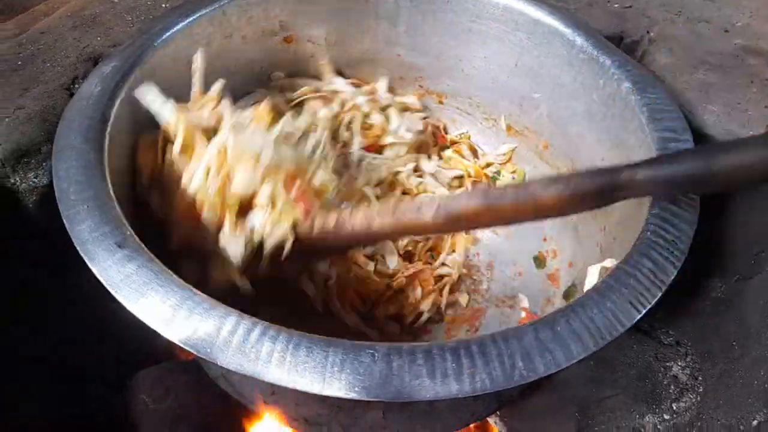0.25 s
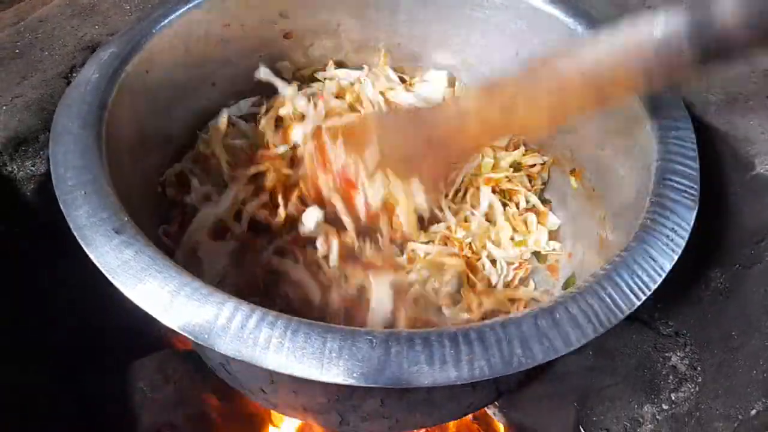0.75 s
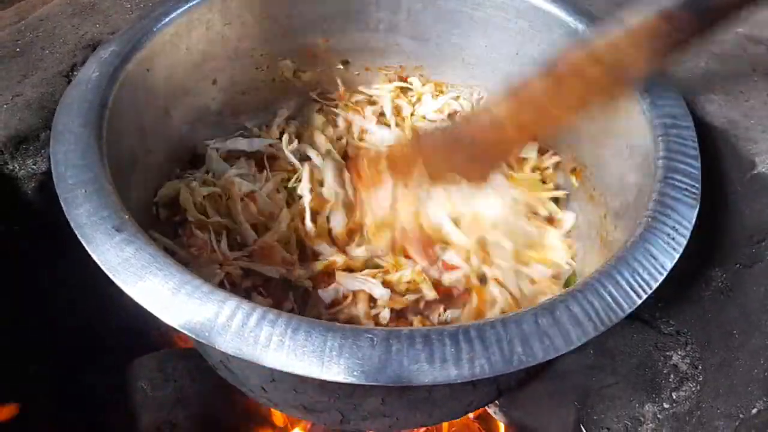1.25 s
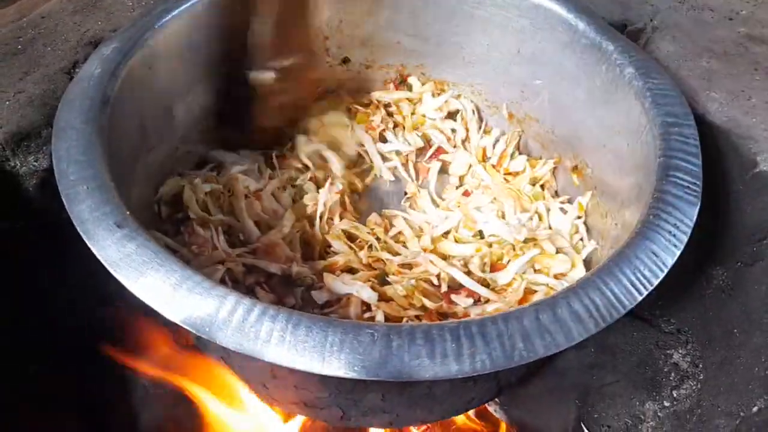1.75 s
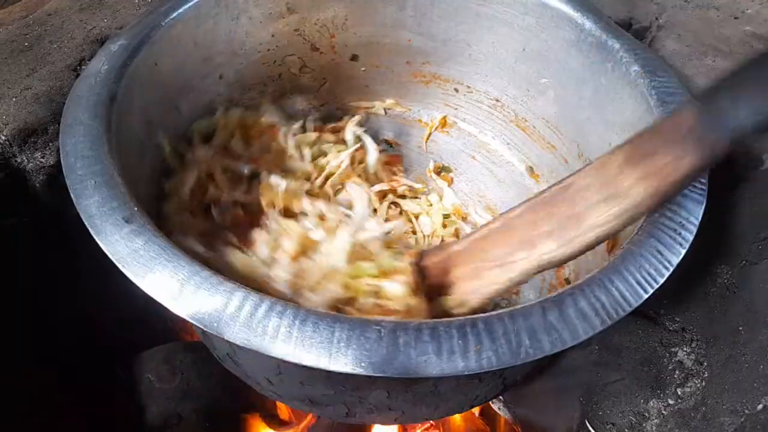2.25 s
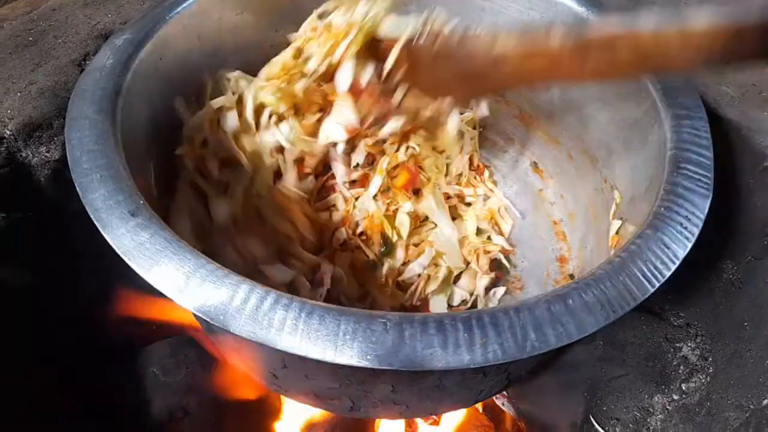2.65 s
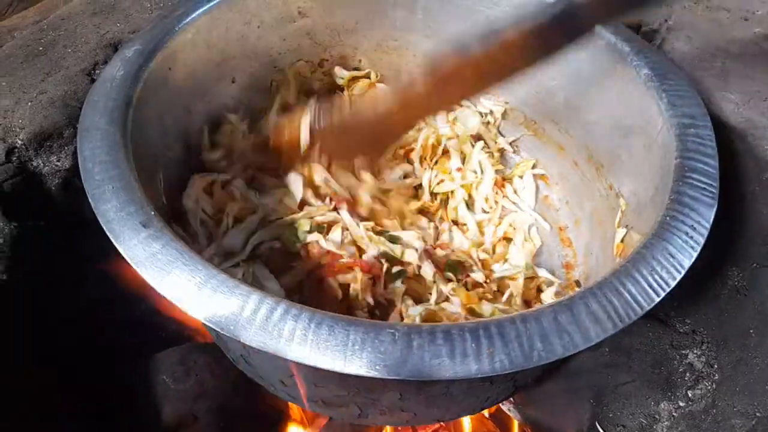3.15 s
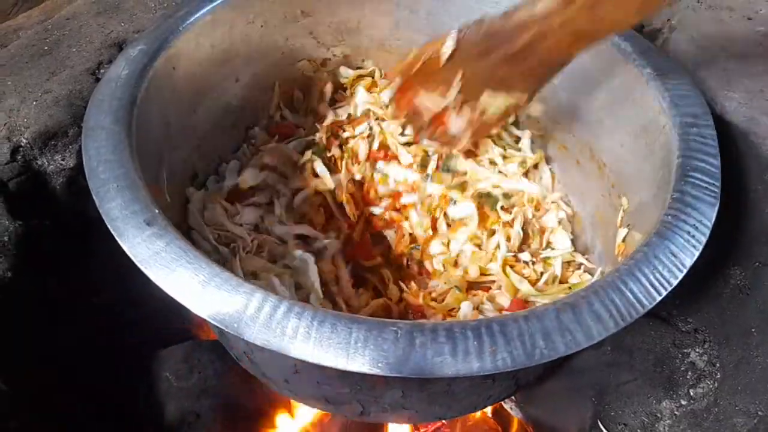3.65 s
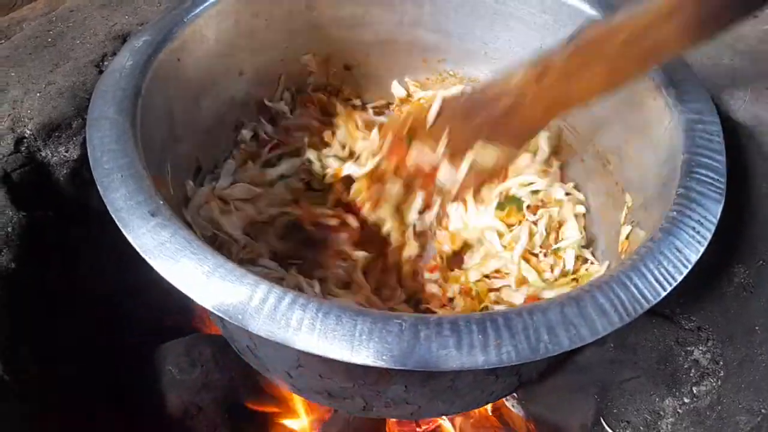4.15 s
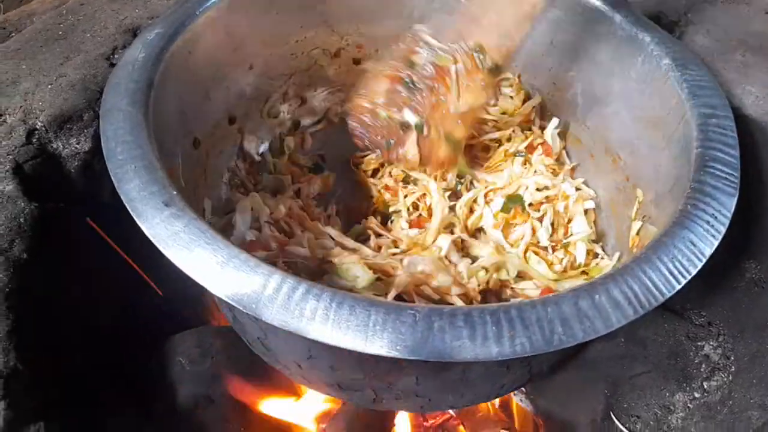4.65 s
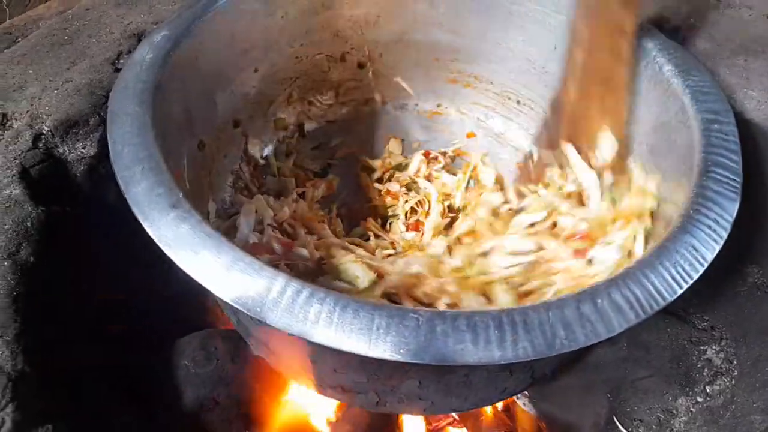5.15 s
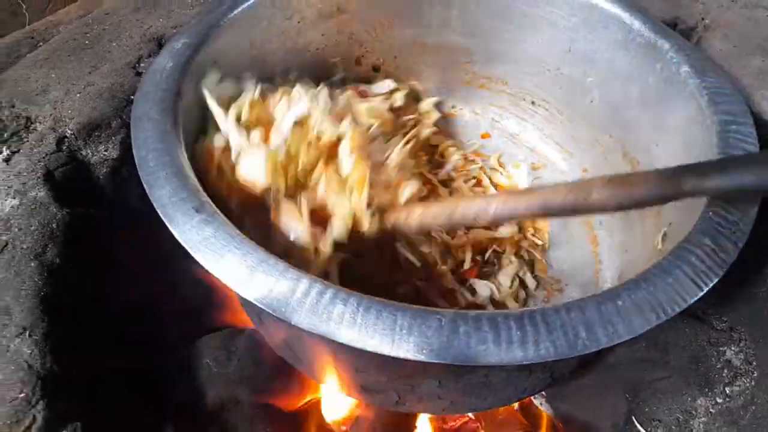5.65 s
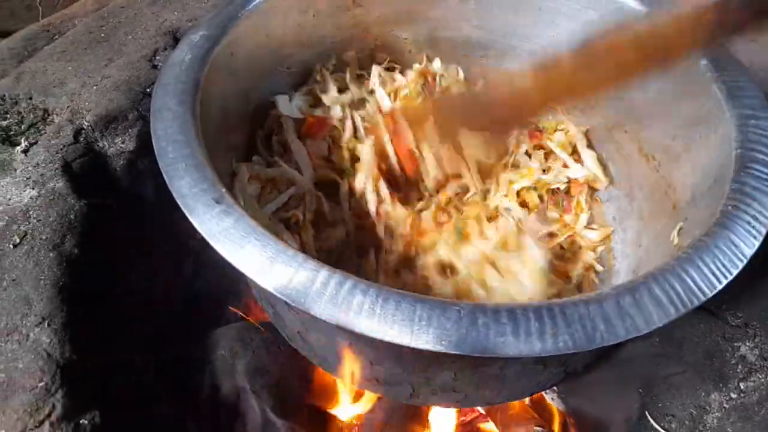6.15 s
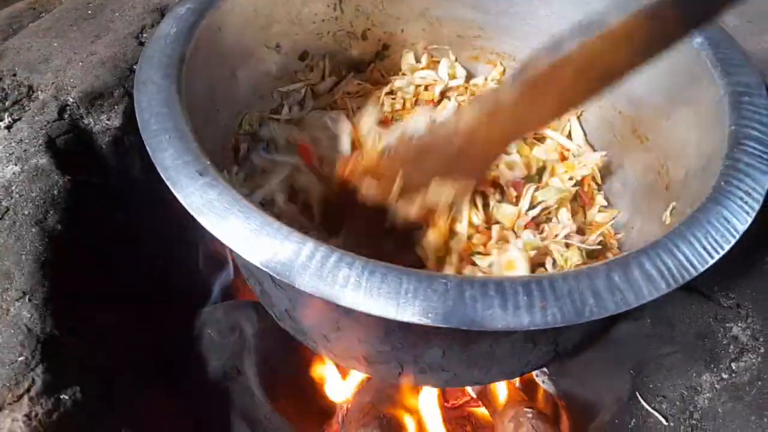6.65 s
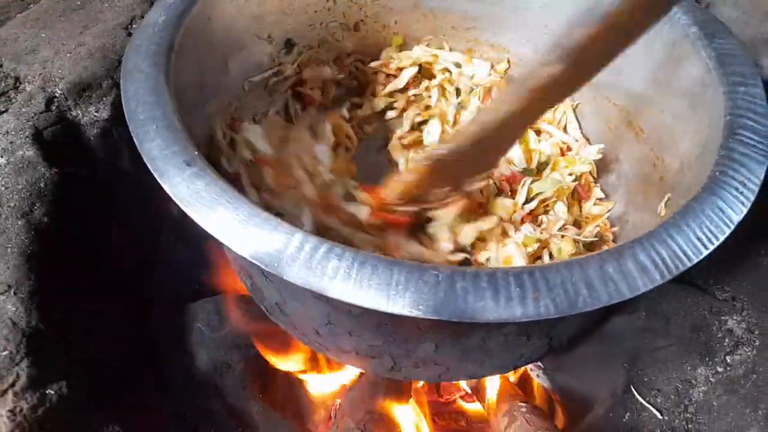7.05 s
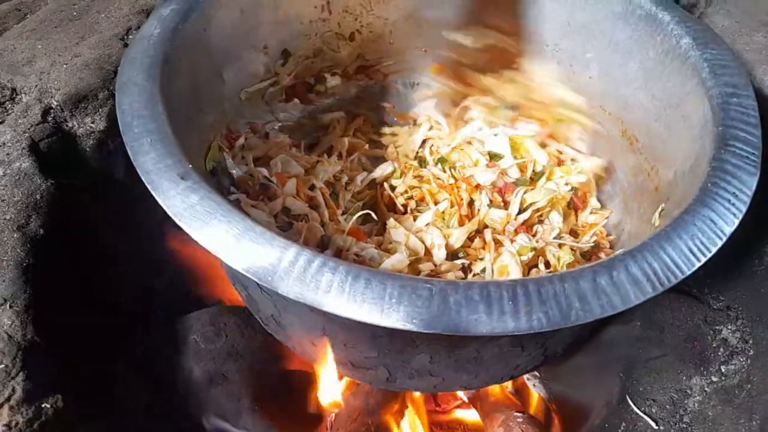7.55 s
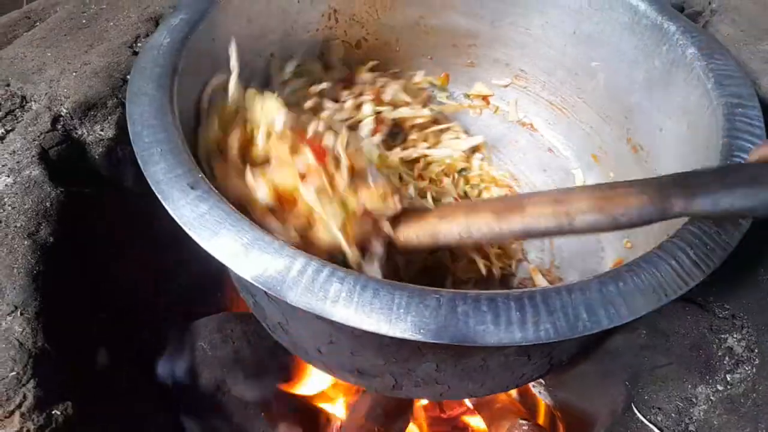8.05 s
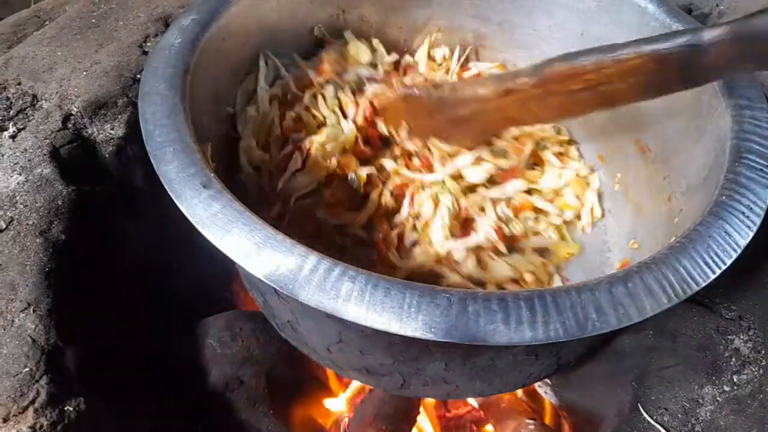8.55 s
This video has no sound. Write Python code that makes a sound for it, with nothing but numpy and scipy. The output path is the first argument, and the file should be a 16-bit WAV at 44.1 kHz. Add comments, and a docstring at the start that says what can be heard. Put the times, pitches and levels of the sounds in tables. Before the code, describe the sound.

Hollow wooden paddle knocks on a big metal pot, with frying hiss fading from strong to faint, small crackles, clinks and low fire rumble.

```python
"""A strong fry hiss, soon fainter, with bright ticks and flares: steam bubbles as shaped noise and packets.
A wooden paddle knocks and scrapes a wide metal pot of shredded vegetables: thumps, slips, dying modes.
Small metal clinks ring, and a steam whistle (narrow noise) glides upward midway.
Lumpy low noise makes the rumble of a wood fire together with the thudding, rocking pot;
a limiter ducks the whole mix after the loudest knocks."""
import sys
import numpy as np
from scipy import signal
from scipy.io import wavfile
from scipy.ndimage import uniform_filter1d, minimum_filter1d

SR = 44100
rng = np.random.default_rng(int(sys.argv[2]) if len(sys.argv) > 2 else 0)


def to_wav(s):
    """Save 16-bit WAV."""
    ch = np.atleast_2d(s).T  # columns
    pcm = np.round(np.clip(ch, -1, 1) * 32767)  # PCM
    wavfile.write(sys.argv[1], SR, pcm.astype(np.int16))


N = 388962


def amp(db):
    """Decibels to gain."""
    return 10 ** (np.asarray(db) / 20)


def even(x):
    """Scales to rms 1."""
    return x / np.sqrt(np.mean(x ** 2) + 1e-20)


def read(points, hz):
    """Reads a spectrum on a log-frequency axis."""
    f, value = np.transpose(points)
    return np.interp(np.log(hz + 1), np.log(f + 1), value)


def follow(rows, t):
    """Columns of a curve table at times t; end rows hold outside the table."""
    s, *columns = np.transpose(rows)
    return [np.interp(t, s, c) for c in columns]


def add(mix, s, sound):
    """Mixes a sound in at time s."""
    part = mix[..., round(s * SR):][..., :sound.shape[-1]]
    part += sound[..., :part.shape[-1]]


def pan(left_minus_right_db):
    """Left and right gains for a level difference."""
    return amp(np.multiply.outer([.5, -.5], left_minus_right_db))


def smooth_noise(count, width):
    """Random curve averaged over width steps, rms 1."""
    return even(uniform_filter1d(rng.standard_normal(count), width))


def ring(modes, extra_db=0., longer=1., rise_s=0.017, phase_rad=0.):
    """Sum of dying sines with a soft onset; longer scales each t60."""
    hz, db, t60_s = np.transpose(modes)[:, :, None]
    t = np.arange(SR // 3) / SR
    decay = amp(db + extra_db - 60 * t / (t60_s * longer))
    waves = decay * np.sin(2 * np.pi * hz * t + phase_rad)
    return waves.sum(0) * (1 - np.exp(-t / rise_s))


def packet(hz, cycles, length=2000):
    """Wave packet that swells over some cycles, then dies away."""
    t = np.arange(length) / SR
    u = t * hz / cycles
    return (u * np.exp(1 - u)) ** 2.32 * np.sin(2 * np.pi * hz * t + 3.17)


def noise(field_db, same, size):
    """Two-channel noise from random short-time spectra; field_db(hz, t) gives spectrum and level course."""
    hop = size // 4
    hz, t = np.fft.rfftfreq(size, 1 / SR), np.arange(N // hop + 5) * hop / SR
    a, b, c, d = rng.standard_normal((len(t), len(hz), 4)).T
    same = np.clip(same(hz), -1, 1)[:, None]
    left = a + 1j * b
    right = same * left + np.sqrt(1 - same ** 2) * (c + 1j * d)
    shape_db, level_db = field_db(hz, t)
    spectra = np.array([left, right]) * amp(shape_db)
    waves = signal.istft(spectra, nperseg=size, noverlap=size - hop)[1]
    return even(waves[:, :N]) * amp(level_db)


# frying hiss course, fading overall, with a brief dip after the loud knock at 4.84 s:
# (time [s], hiss level [dB], low fizz against hiss [dB], top against hiss [dB])
FRYING_COURSE = [(0, -27, -2, -4), (0.14, -29, -11, -5.5), (0.22, -32.5, -6.5, -2), (0.4, -37, -10.5, 0.5),
                 (0.86, -36, -6, -4.5), (1.5, -41, -5, -3), (2.06, -38, -2.5, -7), (2.55, -40.5, -7, 2),
                 (3.1, -38.5, -3, -3.5), (3.66, -42.5, -6.5, 0), (4.27, -40.5, -8.5, -4.5),
                 (4.6, -42.5, -5, -4.5), (4.84, -42.5, -2, -1.5), (4.865, -46.5, 0.1, -3.5),
                 (4.93, -43, 0.5, -3), (5.3, -42.5, 1.5, -3), (5.65, -47, -8.5, -1),
                 (5.85, -46.5, -7.5, -2.1), (6.3, -43.5, -2.5, -2), (6.8, -46, -5.5, 1),
                 (7.17, -48, -1.5, -1), (7.45, -40, -4.5, -6.5), (8.0, -43, -3, 1), (8.2, -48.5, -5, 1),
                 (8.82, -42.5, -3, -1)]
# wet leaves flare on hot metal:
# (time [s], level change [dB], half-width at half height [s], low fizz change [dB], top change [dB])
LEAF_FLARES = [(0.64, 0, 0.033, 8, 0.5), (1, -0.5, 0.023, 6.5, 7.5), (2.27, 5.5, 0.12, 1, 1),
               (2.768, 3.5, .03, 3, -5.5), (2.906, 3, 0.068, 0.5, 0), (3.198, 3.5, 0.037, 3.5, 5),
               (3.469, 5.5, 0.053, 6, -4.5), (3.88, 2.5, 0.046, 4.5, -3), (4.082, 3, 0.033, 3.5, -2.5),
               (4.433, 4, 0.075, 3, 1), (4.761, 2, .06, -2.5, -0.5), (4.95, 6.5, 0.022, -10, -7.5),
               (5.041, 4.5, 0.01, -7.5, -4), (5.49, 4, 0.054, -2, 0.1), (5.728, -1.7, .04, 13, 1.5),
               (6.392, 5, 0.039, 1.5, -2.5), (6.612, 5.5, 0.048, 3, -4), (6.907, 0.5, 0.019, 7.5, -2),
               (7.015, 3.5, .05, 6.5, -1), (7.33, 3, 0.014, -3.5, -6), (7.58, 1, 0.055, 5, 0),
               (7.741, -1.2, 0.035, 8.5, 0), (7.888, 3.5, 0.035, 3, -2.5), (8.14, 3, 0.065, -5.5, -0.5),
               (8.387, 0, 0.019, 8, 2), (8.542, 1, 0.1, 2.5, -0.5)]


def heat(t):
    """Frying level, low fizz and top in dB: the fading course plus a smooth hump per flare."""
    course = np.array(follow(FRYING_COURSE, t))
    for s, level_db, half_s, low_db, top_db in LEAF_FLARES:
        near = slice(*np.searchsorted(t, [s - 2 * half_s, s + 2 * half_s]))
        hump = np.cos(np.pi / 4 * (t[near] - s) / half_s) ** 2
        course[:, near] += np.outer([level_db, low_db, top_db], hump)
    return course


# hiss spectrum: (frequency [Hz], density [dB per Hz])
HISS_SPECTRUM = [(350, -5), (700, -8.5), (1040, -4), (1400, -4), (2200, -3.5), (3170, -5), (4500, -3.5),
                 (6000, -1.5), (7170, -3.5), (8220, -17.5), (9500, -11), (11700, -6.5), (15000, -9),
                 (16000, -4.5)]
# left-right likeness of the hiss: (frequency [Hz], correlation [1])
HISS_LIKENESS = [(550, 0.69), (1650, 0.023), (5000, 0.011)]
# hiss balance: (frequency [Hz], left minus right [dB])
HISS_LEAN = [(60, 4), (150, -12.5), (380, 6), (950, -2.5), (2380, 0.5), (5980, -8), (15000, -5.5)]
DRIFT_DB_PER_S = 0.28  # hiss above the low fizz drifts leftward


def frying():
    """Countless bursting steam bubbles: hiss with drifting patches and a shared flicker."""
    def field(hz, t):
        _, low_db, top_db = heat(t)
        low, top = np.clip((4200 - hz) / 2700.0, 0, 1), np.clip((hz - 7400) / 1200., 0, 1)
        tilt_db = np.outer(low, low_db - low_db.mean()) + np.outer(top, top_db - top_db.mean())
        patches = uniform_filter1d(rng.standard_normal(tilt_db.shape), 6, 0)  # along frequency
        patches = even(uniform_filter1d(patches, 30, 1))  # along time
        flicker_db = 0.97 * rng.standard_normal(len(t)) + 0.63 * smooth_noise(len(t), 30)
        wander_db = DRIFT_DB_PER_S * (t - t.mean()) + 0.93 * smooth_noise(len(t), 40)
        lean_db = read(HISS_LEAN, hz)[:, None] + (1 - low[:, None]) * wander_db
        shape_db = read(HISS_SPECTRUM, hz)[:, None] + tilt_db + 1.3 * patches + flicker_db
        shape_db = shape_db + np.multiply.outer([.5, -.5], lean_db)
        return shape_db, heat(np.arange(N) / SR)[0]
    return noise(field, lambda hz: read(HISS_LIKENESS, hz), size=256)


CRACKLE_DB, POPS_PER_S = -16, 600.  # level against the hiss; mean rate


def crackle():
    """Small bubbles popping at random over the hiss: short packets in 16 pitches."""
    level_db, out = heat(np.arange(N) / SR)[0], np.zeros((2, N))
    size_db = 3.5 * np.minimum(rng.exponential(1, N), 3.5)
    pops = amp(size_db) * (rng.random(N) < POPS_PER_S / SR)
    pitches_hz = np.geomspace(2500, 14500, 16)
    kind = rng.integers(0, len(pitches_hz), N)
    for k, hz in enumerate(pitches_hz):
        grain = amp(read(HISS_SPECTRUM, hz)) * (hz / 6000) ** 1.46 * packet(hz, 2.46, length=300)
        place = pan(read(HISS_LEAN, hz) + 3 * rng.standard_normal())[:, None]
        out += place * signal.oaconvolve(pops * (kind == k), grain)[:N]
    return amp(level_db + CRACKLE_DB) * even(out)


# short bright ticks, spits of fat and the bright attacks of metal clinks:
# (time [s], level [dB], frequency [Hz], left minus right [dB])
BRIGHT_TICKS = [(1.2456, -38, 5500, -5.5), (1.388, -37, 5980, -24), (2.582, -32, 5800, -6.5),
                (2.62, -23, 1400, 0.1), (2.7232, -19.5, 4750, -8), (3.1667, -35, 2640, -1),
                (3.4516, -36, 4890, -6), (3.4815, -29, 7020, -13), (3.729, -25, 2780, 3),
                (3.75, -30, 2820, 3), (4.0362, -25, 5450, -10), (4.1944, -26, 3600, -2),
                (4.3125, -22.5, 2240, 2), (4.7955, -35, 5480, 1), (4.92, -22, 5780, -6),
                (5.0449, -30, 5710, -6.0), (5.1577, -33, 5440, -7), (5.952, -30, 4740, -6),
                (6.2891, -36, 6270, -4.5), (6.6124, -30, 4820, -1), (6.869, -30, 4940, -2.0),
                (6.883, -32, 5500, -13), (7.39, -32.5, 6690, -7), (7.457, -28, 6010, -3),
                (7.5028, -28, 5910, -3), (7.5266, -26.5, 6000, -7), (8.37, -27, 5730, -4.0)]


def ticks():
    """Spits and bright clink attacks: a crack of noise that rings for a few cycles."""
    out, t = np.zeros((2, N)), np.arange(700) / SR
    bursts = rng.standard_normal((len(BRIGHT_TICKS), 2, len(t)))
    for (s, db, hz, pan_db), puff in zip(BRIGHT_TICKS, bursts):
        resonance = signal.iirpeak(hz, 2.5, fs=SR)
        tone = signal.lfilter(*resonance, signal.lfilter(*resonance, puff))
        tone = tone + 0.089 * np.gradient(puff, axis=1)  # bright crack
        add(out, s, amp(db) * pan(pan_db)[:, None] * tone * np.exp(-t / 0.0061))
    return out


# paddle blows: (time [s], level [dB], thump [Hz], then drives against the thump:
# rim [dB], struck rim place [Hz], upper rim [dB], pot tone [dB])
PADDLE_BLOWS = [(0.096, -23, 505, -35, 810, -11, -22), (0.447, -38, 420, -10, 835, -8, -6),
                (0.611, 1, 450, -33, 960, -47, -15.5), (0.918, -30.5, 367, -22, 1010, -15, -8),
                (1.143, -12.5, 356, -18.5, 847, -23.5, 4), (1.268, -34.5, 355, -2.5, 960, -11, -10),
                (1.286, -37, 415, 3.5, 980, -3, -25), (1.687, -22, 420, -37, 990, -23, 2.5),
                (1.741, -23.5, 348, -40, 904, -28, -21), (1.803, -3, 433, -21, 812, -40, -26),
                (1.826, -13.5, 405, -21, 810, -36, -18), (1.93, -31, 343, -22, 920, -24, -19),
                (2.153, -14, 567, -15.5, 950, -21, -19), (2.172, -25, 520, -25, 950, -20, -20),
                (2.195, -28, 350, -22, 960, -17, -15), (2.308, -34.5, 466, -21, 999, -18, -1),
                (2.435, -30.5, 312, -38, 930, -21, -10), (2.588, -42, 404, -2, 975, -5, -17),
                (2.705, -36, 360, -14, 853, -5, 1.5), (3.124, -24, 312, -32, 996, -32, -2.5),
                (3.143, -14.5, 386, -38, 953, -26, -30), (3.279, -33, 420, -5, 826, -1, -25),
                (3.454, -2, 410, -27.5, 740, -48, -16.5), (3.479, -24.5, 315, -10.5, 1003, -10, -23),
                (3.741, -39, 360, -28, 816, -19, -2), (4.036, -23, 440, -25, 999, -16, -17),
                (4.053, -22.5, 397, -28, 860, -33, -12), (4.309, -31.5, 336, -38, 910, -29, 0),
                (4.405, -33, 320, -27, 860, -8, -5), (4.798, -30.5, 370, -10, 830, -19, 5.5),
                (4.843, 3, 437, -55, 824, -51, -23), (4.919, -20, 455, -23, 975, -22, -6),
                (4.949, -25, 289, -12.5, 820, -14, -6), (5.062, -30, 432, -25, 950, -15, -26),
                (5.156, -2, 418, -31, 800, -43, -12), (5.248, -12, 484, -11.5, 951, -20, -38),
                (5.379, -37, 438, -16, 945, -8, -24), (5.453, -34.5, 433, -28, 910, -16, -14),
                (5.54, -34.5, 553, -28, 980, -23, -11), (5.629, -47, 330, -25, 950, -19, -18),
                (5.693, -33.5, 430, -12, 940, -29, -15), (5.72, -35, 427, 13, 951, 7, -21),
                (5.93, -41, 484, -19, 960, -21.5, -16), (5.961, -47, 400, -17, 940, -22, -20),
                (6.02, -29, 326, -26, 802, -29, -23), (6.149, -42, 440, -12, 970, -20, -20),
                (6.237, -13, 355, -26, 835, -28.5, -3.5), (6.322, -31.5, 370, -25, 930, -26, 3.5),
                (6.418, -45, 403, 3, 970, 4, -18), (6.587, -18, 393, -23, 970, -31, -37),
                (6.631, -30, 298, -9, 962, -23, -8), (7.332, -15, 356, -8.5, 849, -23, 1.5),
                (7.405, -1, 414, -56, 856, -54, -31), (7.455, -11, 298, -29, 850, -43, -13),
                (7.53, -14, 390, -16, 824, -14.5, -16), (7.617, -21.5, 360, -36, 940, -19, -24),
                (7.742, -10.5, 486, -14, 944, -22, -40), (7.832, -33, 566, -12, 956, -19, -4),
                (7.87, -24, 450, -39, 940, -32, -18), (7.913, -18.5, 436, -40, 931, -25, -33),
                (7.929, -23.5, 490, -37, 835, -24, -23), (7.997, -33.5, 324, -18, 804, -14, -7),
                (8.267, -26, 342, -13, 947, -30, -6), (8.36, -36, 312, -13, 916, -17, -5),
                (8.505, -16.5, 312, -34, 865, -37, -10), (8.787, -19, 325, -30, 960, -27, -19)]
# pot floor modes: (frequency [Hz], level [dB], unscaled t60 [s])
FLOOR_MODES = [(225, -22.5, 0.058), (271.3, -7.5, 0.23), (312, 2.5, 0.16), (380.5, -15, 0.39),
               (420, 8, 0.11), (455, -7, 0.3), (484, 3.5, 0.12), (540, -7, 0.3), (557.3, -2, 0.15),
               (613, -2.5, 0.085), (644.5, -6, 0.13), (660, -8.5, 0.21), (707, -8.5, 0.17)]
# pot rim modes: (frequency [Hz], level [dB], unscaled t60 [s])
RIM_MODES = [(821, 0, .3), (858, 0, .42), (955, 0, .24), (985, -2, .2), (1040, -8, .15), (1190, -9, .15),
             (1335, -5, .22), (1480, -10, .1), (1600, -6, .22), (1700, -10, .1), (1835, -3, .22),
             (2035, -8, .22), (2300, -12, .1)]
# whole pot rocking on its stones: (frequency [Hz], level [dB], t60 [s])
ROCKING_MODES = [(75.5, 3.8, 0.1), (117.4, 8.5, 0.15), (133.2, 0.5, 0.23), (189.3, -0.5, 0.2)]
# pot tone near 350 Hz with its own level for each blow: (frequency [Hz], level [dB], unscaled t60 [s])
POT_TONE = [(349.8, -2, 0.26)]
# floor ring against the thump; deep blows ring more; harder blows shorten the ring
RING_DB, RING_DB_PER_OCT, RING_LENGTH, PRESS_PER_DB = -13.5, -9.5, 0.69, 0.006
RIM_LENGTH, EDGE_LENGTH = 0.7, 0.53  # t60 factors; modes from 1100 Hz up have the shorter one
RIM_FOCUS_DB_PER_OCT2 = 2500.  # a blow wakes mostly the rim mode nearest its place
SWAY_DB, SWAY_PER_DB = -32, 0.94  # rocking after a 0 dB blow; growth with the blow
BOUNCE_S, BOUNCE_DB = 0.019, -18  # median delay and level of the paddle's second touch


def knocks():
    """Each blow: a thump of the air in the pot, a clack of the wall, then modes near the struck place."""
    out = np.zeros(N)
    floor_hz, rim_hz = np.array(FLOOR_MODES)[:, :1], np.array(RIM_MODES)[:, :1]
    floors, rims = len(FLOOR_MODES), len(RIM_MODES)
    luck = rng.standard_normal((len(PADDLE_BLOWS), 2 * floors + rims))[:, :, None]
    bounce = rng.standard_normal((len(PADDLE_BLOWS), 2))
    sway, pot_tone = ring(ROCKING_MODES, rise_s=0.0045), ring(POT_TONE, rise_s=0.015)
    high_pass = signal.butter(2, 170., "high", fs=SR)
    for blow, chance, again in zip(PADDLE_BLOWS, luck, bounce):
        s, db, hz, rim_db, rim_at_hz, edge_db, tone_db = blow
        thump = signal.lfilter(*high_pass, packet(hz, 1.305))
        clack = amp(rim_db + 4.5) * packet(rim_at_hz, 4.4) + amp(edge_db - 4.0) * packet(1590.0, 10.0)
        hit = thump + clack

        near_db = -12. * np.log2(floor_hz / hz) ** 2 + 3.1 * chance[:floors]
        floor_db = near_db + RING_DB + RING_DB_PER_OCT * np.log2(hz / 400)
        phase_rad = 1.5 * chance[floors:-rims]
        floor = ring(FLOOR_MODES, floor_db, RING_LENGTH - PRESS_PER_DB * db, 0.003, phase_rad)

        off_db = np.minimum(RIM_FOCUS_DB_PER_OCT2 * np.log2(rim_hz / rim_at_hz) ** 2, 22.)
        near_db = np.where(rim_hz < 1100, rim_db - off_db, edge_db + 2.8 * chance[-rims:])
        rim_length = np.where(rim_hz < 1100, RIM_LENGTH, EDGE_LENGTH)
        rim = ring(RIM_MODES, near_db - 2.5, rim_length, 0.0029)

        add(out, s, amp(db) * hit)
        add(out, s + BOUNCE_S * amp(1.556 * again[0]), amp(db + BOUNCE_DB + 3.4 * again[1]) * hit)
        rocking = amp(SWAY_DB + SWAY_PER_DB * db) * sway
        add(out, s, amp(db) * (floor + rim + amp(tone_db) * pot_tone) + rocking)
    return out


# paddle strokes along the metal: (start [s], length [s], level [dB], rim against level [dB])
PADDLE_STROKES = [(0, 0.23, -40, -9), (0.397, 0.36, -56.5, -1), (0.894, 0.11, -44, -11),
                  (1.315, 0.15, -63, 8), (1.843, 0.11, -41, -11), (1.962, 0.27, -51.5, 6),
                  (2.17, 0.27, -51, -10), (2.57, 0.15, -58, 8), (2.756, 0.32, -49, -7),
                  (3.145, 0.36, -54.5, 6), (3.497, 0.11, -50, -4), (3.717, 0.14, -54, -8),
                  (3.795, 0.27, -58.5, 4), (4.065, 0.11, -52, 0), (4.187, 0.056, -54, -19),
                  (4.296, 0.25, -45.5, -21), (4.905, .2, -45, -11), (5.268, 0.4, -52.5, -14),
                  (6.3, 0.25, -59, 2), (6.855, .25, -51, -13), (7.347, 0.12, -42, -10),
                  (7.526, .1, -46, 7.5), (7.65, 0.46, -43.5, -9), (8.285, 0.15, -57, -12),
                  (8.524, 0.11, -51, -7), (8.769, 0.05, -41.5, -6)]
STROKE_RISE = .15  # share of a stroke
MURMUR_DB, MURMUR_RIM_DB = -57.5, -13.5  # leaves shifting between strokes; rim against it
GRIND_DB, SLIPS_PER_S = -10, 500.  # rocking on the stones against the scrape; mean rate


def scrape():
    """Uneven slips of wood and leaves on metal keep the pot modes murmuring; each stroke swells and fades."""
    level, rim_level = np.full(N, amp(MURMUR_DB)), np.full(N, amp(MURMUR_DB + MURMUR_RIM_DB))
    for s, length_s, db, rim_db in PADDLE_STROKES:
        u = np.arange(0, length_s, 1 / SR) / length_s
        stroke = np.minimum(u / STROKE_RISE, 1) * (1 - u ** 2.25)
        add(level, s, amp(db) * stroke)
        add(rim_level, s, amp(db + rim_db) * stroke)
    size_db = 4 * np.minimum(rng.exponential(1, N), 4)
    slips = amp(size_db) * rng.standard_normal(N) * (rng.random(N) < SLIPS_PER_S / SR)

    def shake(response):
        return even(signal.oaconvolve(slips, response)[:N])

    rim_modes = RIM_MODES[2:]
    rim_db = -7. * np.log2(np.array(rim_modes)[:, :1] / rim_modes[0][0])  # upper modes speak less
    floor = shake(ring(FLOOR_MODES + POT_TONE, longer=0.88))
    rim = shake(ring(rim_modes, rim_db, 0.48))
    grind = shake(ring(ROCKING_MODES))
    return level * (floor + amp(GRIND_DB) * grind) + rim_level * rim


# small metal clinks: (time [s], level [dB])
CLINK_TIMES = [(2.7214, -31.5), (3.3034, -37), (4.195, -41), (4.7944, -41.5), (5.0194, -54)]
# clink modes: (frequency [Hz], level [dB], t60 [s])
CLINK_MODES = [(1835, 1, .17), (1800, -6, .12), (1930, -6, .12), (3590, -2, .1), (3665, -2, .08),
               (4850, -6, .05)]


def clinks():
    """Small metal modes struck by a briefly chattering contact."""
    out = np.zeros(N)
    chatter = np.exp(-np.arange(900) / SR / .002)
    contacts = rng.standard_normal((len(CLINK_TIMES), 900)) * chatter
    body = ring(CLINK_MODES, rise_s=0.00067)
    for (s, db), contact in zip(CLINK_TIMES, contacts):
        add(out, s, amp(db) * signal.oaconvolve(contact / np.linalg.norm(contact), body))
    return out


# steam through a gap in the leaves: (time [s], frequency [Hz], level before pan [dB])
STEAM_GLIDE = [(4.1, 4880, -60), (4.3, 5050, -56), (4.55, 5355, -52.5), (4.8, 5520, -48.5),
               (4.95, 5800, -54), (5.08, 6060, -54), (5.22, 6600, -60), (5.35, 7400, -79)]


def whistle():
    """Steam tone: noise 300 Hz wide on a carrier that glides upward."""
    hz, db = follow(STEAM_GLIDE, np.arange(N) / SR)
    pole = np.exp(-np.pi * 300. / SR)
    slow = signal.lfilter([1], [1, -pole], rng.standard_normal(N) + 1j * rng.standard_normal(N))
    carrier = np.exp(2j * np.pi * np.cumsum(hz) / SR)
    return pan(-9.5)[:, None] * amp(db) * even((slow * carrier).real)


# low rumble of the fire together with the thudding and rocking pot: (time [s], level [dB])
RUMBLE_COURSE = [(0.0, -50.5), (0.42, -64), (1.13, -57), (1.45, -61), (1.89, -57), (2.01, -60), (3.37, -55),
                 (3.93, -56.5), (4.17, -55), (4.79, -60), (5.01, -52.5), (5.8, -59), (6.46, -56),
                 (7.37, -56), (7.54, -59), (7.93, -52.5), (8.4, -53), (8.82, -51)]
# rumble spectrum: (frequency [Hz], density [dB per Hz])
RUMBLE_SPECTRUM = [(15, -59), (30, -41), (45, -20), (76, 10.5), (105, -2), (200, -24), (340, -65)]


def rumble():
    """Lumpy low rumble of fire and thudding, rocking pot: noise with a randomly wavering level."""
    def field(hz, t):
        lumps_db = 3.9 * smooth_noise(len(t), 4)
        level_db = follow(RUMBLE_COURSE, np.arange(N) / SR)[0]
        return read(RUMBLE_SPECTRUM, hz)[:, None] + lumps_db, level_db
    return noise(field, lambda hz: 0.49 + 0 * hz, size=2048)


def scene():
    """The pot reaches the left port a little before the right, with a reflection from the ground."""
    pot = knocks() + clinks() + scrape()
    echo = signal.lfilter([1, -1], 1, np.roll(pot, round(0.0031 * SR))) * 3.8  # treble-tilted
    left = pot + 0.067 * echo
    right = np.roll(pot, 8) - 0.3 * echo  # longer way round, in samples
    pot_stereo = pan(-1.2)[:, None] * np.array([left, right])
    return pot_stereo + frying() + ticks() + crackle() + whistle() + rumble()


MIC_LOW_HZ, EDGE_HZ = 47, 15750
LIMIT_DB, RECOVERY_DB_PER_S = -9.5, 60.


def record(dry):
    """Bass cut, a limiter that ducks everything after the loudest blows, a peak guard, then the band limit."""
    bass_cut = signal.butter(2, MIC_LOW_HZ, "high", fs=SR, output="sos")  # small microphones
    dry = signal.sosfilt(bass_cut, dry)
    power_db = 10 * np.log10(abs(uniform_filter1d((dry ** 2).mean(0), 100)) + 1e-12)
    fall_db = np.arange(N) * RECOVERY_DB_PER_S / SR
    peak_db = np.maximum.accumulate(power_db + fall_db) - fall_db
    over_db = np.maximum(peak_db - LIMIT_DB, 0)
    late_db = signal.lfilter([.004], [1, -.996], over_db)  # gain lags a few ms
    ducked = dry / amp(.5 * late_db)  # half the overshoot
    room = np.minimum(.98 / (abs(ducked).max(0) + 1e-9), 1)
    ducked = ducked * uniform_filter1d(minimum_filter1d(room, size=301), size=151)
    low_pass = signal.firwin(2047, EDGE_HZ, window=("kaiser", 9), fs=SR)
    return signal.oaconvolve(ducked, low_pass[None], "same")


dry = scene()
out = record(dry)
to_wav(out)
```